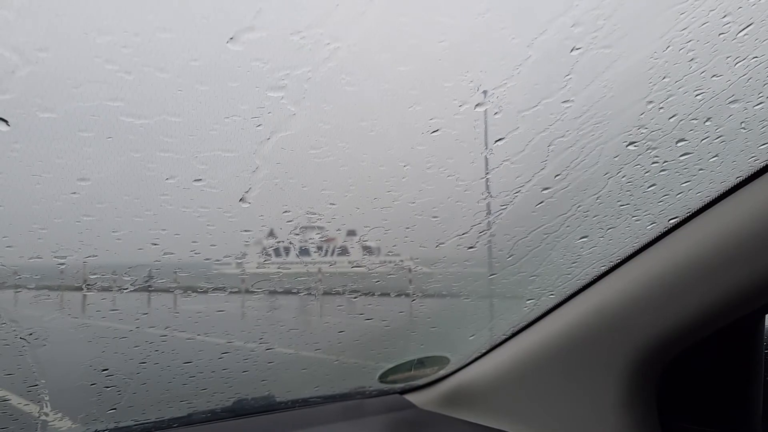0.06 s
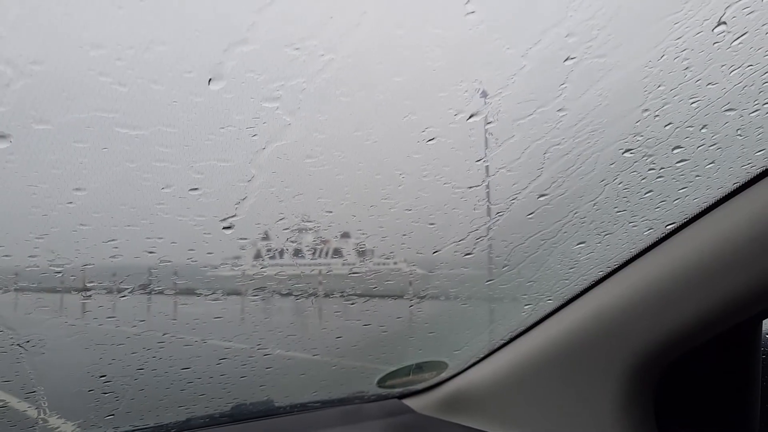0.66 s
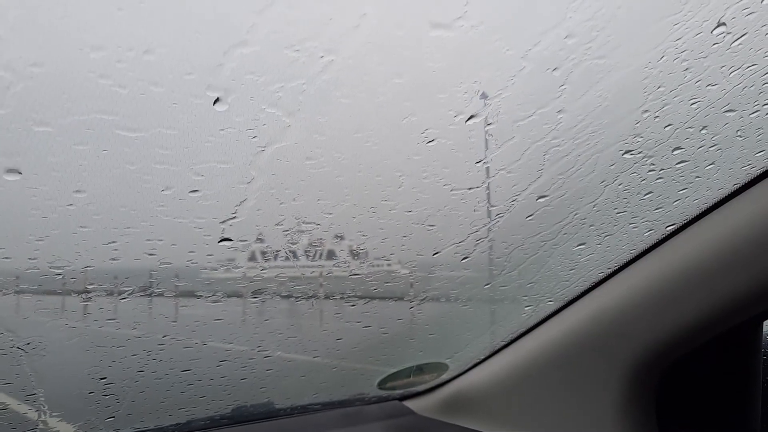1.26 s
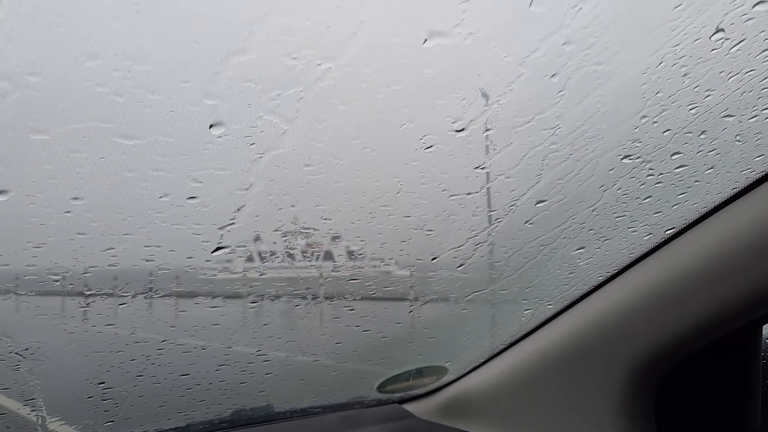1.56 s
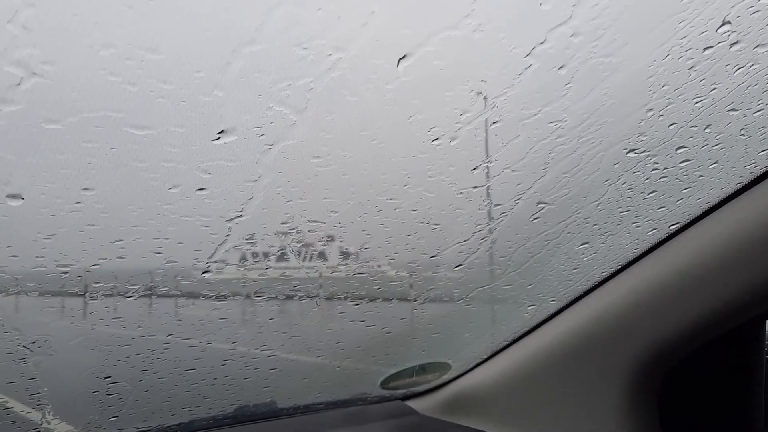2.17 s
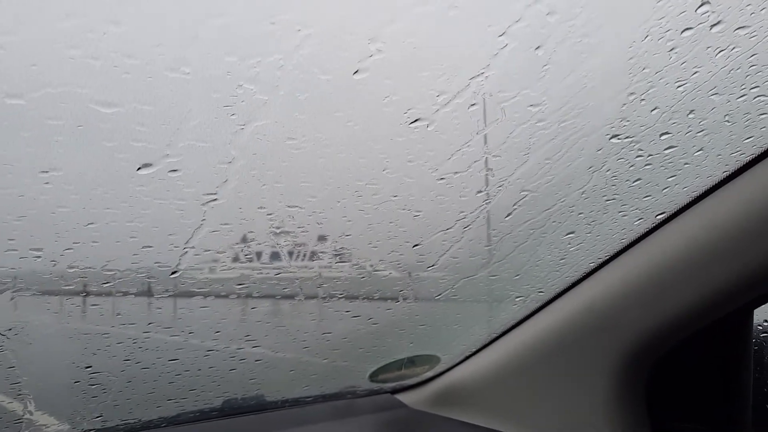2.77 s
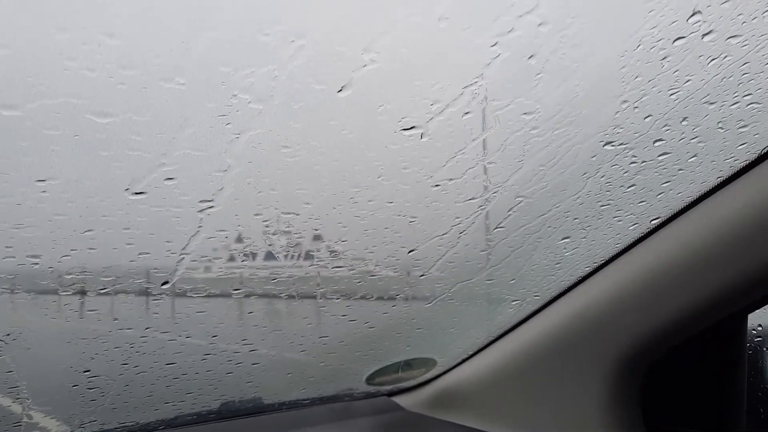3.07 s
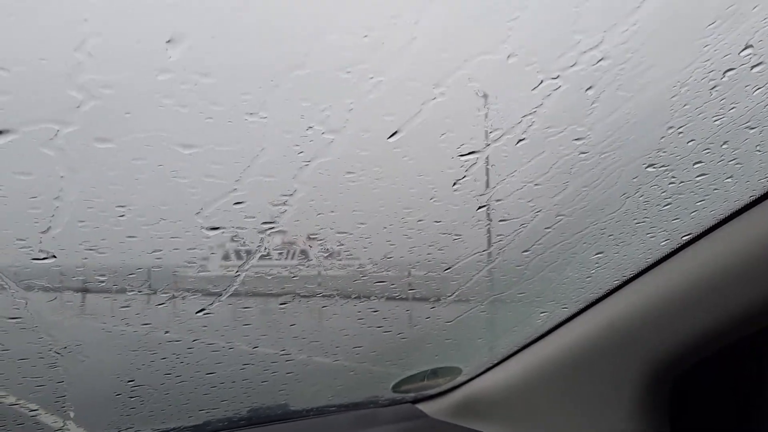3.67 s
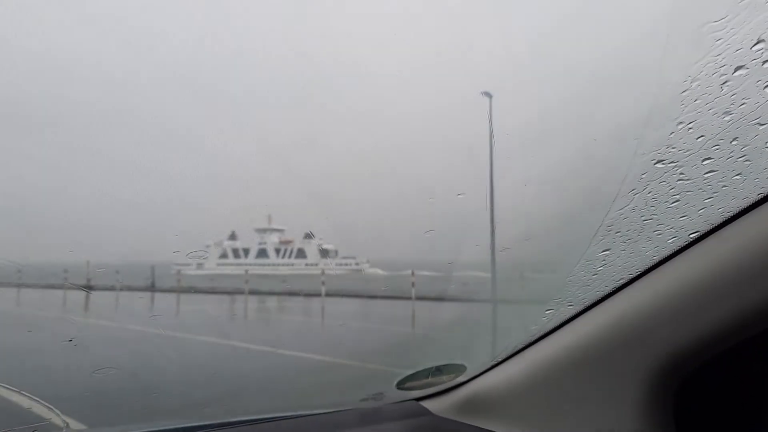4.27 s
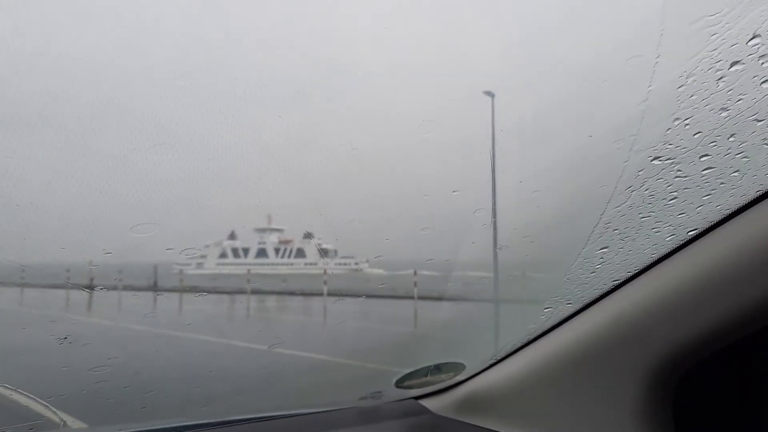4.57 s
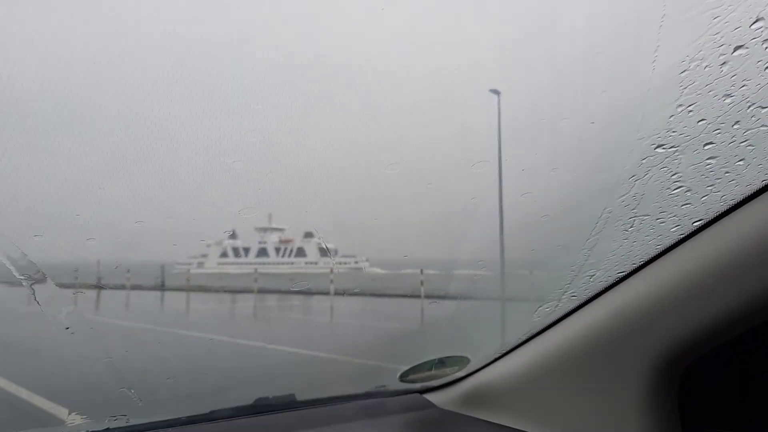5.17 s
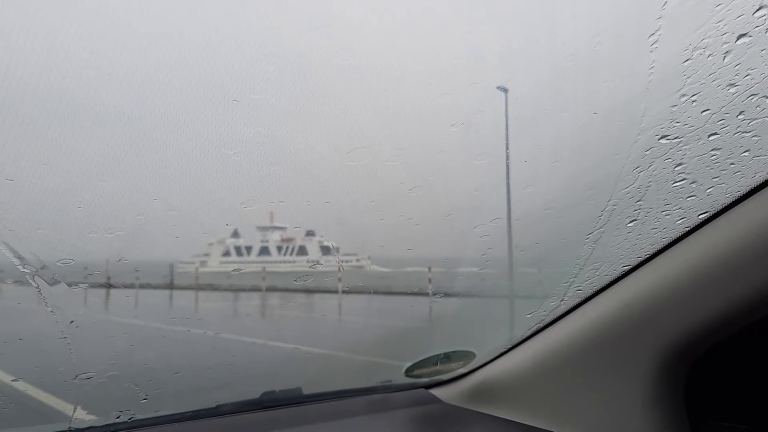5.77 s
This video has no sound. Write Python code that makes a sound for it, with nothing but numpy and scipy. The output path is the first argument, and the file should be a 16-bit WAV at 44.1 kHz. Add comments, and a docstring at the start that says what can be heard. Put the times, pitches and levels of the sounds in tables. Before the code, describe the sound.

Inside an idling car, steady rain ticks on the glass and roof, then the wipers start up with knocks and a low drone.

```python
"""Rain on a parked car

From a front seat: small drops patter on roof and glass, some tick sharply, and fat drips plonk on
the roof panel. Near four seconds the wipers thump into motion, drone through their sweep, knock
as they turn and come back to rest. Underneath, the engine idles and the blower hums."""
import sys
import numpy as np
from scipy import signal
from scipy.fft import rfft, irfft
from scipy.io import wavfile

SR = 44100
rng = np.random.default_rng(int(sys.argv[2]) if len(sys.argv) > 2 else 0)


def transcribe(u):
    """Save the signal u as a 16-bit wav file named by the first command-line argument.

    u: samples, shape (n,) or (channels, n), limited to [-1, 1]; the rate is SR.
    q: integer samples, one column per channel.
    """
    v = np.clip(np.atleast_2d(u).T, -1, 1)
    q = np.round(v * 32767).astype(np.int16)
    wavfile.write(sys.argv[1], SR, q)


N = 256662
TIME = np.arange(N) / SR
WIPERS_ON_S = 3.85
WIPING_S = np.maximum(TIME - WIPERS_ON_S, 0)

# The cabin's low rumble, swelling briefly at the start and again while the wipers run.
# Each row: time in seconds, relative level in dB.
RUMBLE_SWELL = [(0, -39), (.22, -31.5), (.45, -39), (3.3, -37), (4.1, -38), (4.5, -31), (5.1, -36),
                (5.82, -34.5)]


def rain(near_db=10.5, wash_db=8.5, pinpoint_db=-14.5, spray_db=-12, spray_growth=1.8):
    """Separate near drops over a dense wash, with pinpoint ticks and gusts of fine spray on top."""
    # How hard it rains. Each row: time in seconds, relative level in dB.
    intensity = [(0.0, -61), (0.68, -62.5), (1.13, -61), (1.3, -63.5), (1.75, -62), (1.94, -61.5),
                 (2.27, -64), (2.51, -61.5), (2.72, -62), (3.39, -62), (3.84, -62), (4.08, -60),
                 (4.64, -61), (5.06, -61), (5.38, -63), (5.82, -62)]
    # The tone of the patter and of the spray. Each row: frequency in Hz, relative level in dB.
    patter_eq = [(260, -31.5), (450, -1.5), (560, -7.5), (950, -11.5), (1100, -11.5), (1300, -16),
                 (1950, -16.5), (2800, -22.5), (3700, -22.5), (4700, -28), (8200, -33), (9400, -42.5),
                 (12500, -44), (15800, -52)]
    spray_eq = [(3000, -28), (8000, 4), (9600, -4), (11500, 3), (13000, 0), (15800, 2.5)]
    # Gusts throw spray on the glass. Each row: centre in seconds, level in dB, half length in seconds.
    gusts = [(1.83, -70, 0.044), (2.62, -69, .1), (3.55, -69, .13)]
    rain_db = follow(intensity)[0]
    near = shower(per_s=950, spread_db=3.5, decay_s=.0039, octaves=2.1, clump_db=2.5, crack=1)
    near = unit_rms(colour(near, patter_eq))
    wash = noise(lambda f: curve_at(patter_eq, f), N) * amp(.18 * drift(21))
    pinpoints = shower(per_s=110, spread_db=7, decay_s=.0007, octaves=2.2, clump_db=6, crack=2.5)
    pinpoints = unit_rms(colour(pinpoints, spray_eq))
    patter = amp(near_db) * near + amp(wash_db) * wash + amp(pinpoint_db) * pinpoints
    # As the rain thickens, the spray grows faster than the patter.
    spray_gain = amp(rain_db.mean() + spray_db + spray_growth * (rain_db - rain_db.mean()))
    spray_gain += sum(amp(db) * np.exp(-((TIME - s) / half_s) ** 2) for s, db, half_s in gusts)
    hiss = noise(lambda f: curve_at(spray_eq, f), N)
    return amp(rain_db) * patter + spray_gain * hiss


def shower(per_s, spread_db, decay_s, octaves, clump_db, crack, spots=28):
    """Drops of many sizes land at random, louder in clumps, on spots with their own tone and pan."""
    out = np.zeros((2, N))
    clumps_db = clump_db * np.tanh(drift(38))
    for hz in np.geomspace(1100, 14000, spots):
        hits = rng.random(N) < per_s / spots / SR
        size_db = np.minimum(spread_db * rng.exponential(1, N), 12)
        drop = splash(hz, octaves, decay_s * rng.uniform(.43, 2.37), crack, cabin_db=-18) * np.sqrt(hz)
        pan = amp(rng.normal(0, .67) * np.array([[1], [-1]]))
        impacts = hits * amp(size_db + clumps_db)
        out += signal.oaconvolve(impacts[None], drop * pan, axes=1)[:, :N]
    return out


def splash(hz, octaves, decay_s, crack, crack_s=.00014, cabin_db=-17, cabin_s=.016, size=4096):
    """One drop: a crack, the shudder of the pane and a short cabin tail."""
    t = np.arange(size) / SR
    envelope = crack * np.exp(-t / crack_s) + np.exp(-t / decay_s) + amp(cabin_db) * np.exp(-t / cabin_s)
    return noise(lambda f: hump(f, hz, octaves), size) * envelope / (1 + crack)


def glass_ticks():
    """Hard drops and wiper snaps, heard through the glass close by."""
    # The sharpest drops. Each row: start in seconds, level in dB before the glass EQ,
    # centre in Hz, decay in seconds.
    hard_drops = [(0.752, -39.5, 3500, .0078), (0.99, -38, 6950, .003), (1.277, -38, 5970, .003),
                  (1.536, -37.5, 1950, .0064), (1.660, -42, 8000, .002), (1.734, -39.5, 3500, .008),
                  (1.851, -41, 5030, .0057), (2.644, -40, 4000, 0.0076), (2.897, -39.5, 3466, .009),
                  (3.012, -33, 9430, .002), (3.119, -38, 13000, .008), (3.131, -33, 4970, 0.0028),
                  (3.205, -37.5, 3000, 0.0037), (3.539, -36, 7000, 0.0062), (3.715, -39, 6850, 0.0051),
                  (4.104, -40, 3200, .004), (4.465, -35.5, 7500, 0.0024), (4.773, -35.5, 3910, .002),
                  (5.344, -35.5, 4935, .0019), (5.683, -36.5, 5900, .007)]
    # Wet blades and linkage snap and scrape. Each row: start in seconds, level in dB before
    # the glass EQ, centre in Hz, width in octaves, decay in seconds.
    blade_snaps = [(3.829, -35, 4500, 2, 0.019), (3.909, -38, 1200, 0.79, 0.04),
                   (3.946, -29, 3560, 0.44, 0.0027), (5.238, -35, 4920, 1.8, 0.011)]
    # The tone of the glass. Each row: frequency in Hz, gain in dB.
    glass_eq = [(500, 14.5), (2000, 1.5), (3700, 3.5), (5000, -2.5), (8300, -2.5), (9600, -12),
                (12000, -11.5), (15800, -13)]
    out = np.zeros((2, N))
    for s, db, hz, decay_s in hard_drops:
        add(out, s, amp(db) * splash(hz, 1, decay_s, crack=1.75))
    for s, db, hz, octaves, decay_s in blade_snaps:
        add(out, s, amp(db) * splash(hz, octaves, decay_s, crack=.99))
    return colour(out, glass_eq)


def roof_drips(fall_back_s=.0081, fall_back_db=-5.5, panel_swell_s=.0041):
    """Fat drips splatter, partly fall back, and set a roof panel on the left ringing for a few cycles."""
    # Each row: start in seconds, splatter level in dB, its centre in Hz, its decay in seconds,
    # ring level in dB before panning, ring pitch in Hz.
    drips = [(.037, -29.5, 1020, .012, -31, 530), (.299, -43, 1000, 0.011, -51, 550),
             (.367, -45, 800, .005, -53, 553), (1.256, -39, 990, 0.02, -37.5, 600),
             (1.661, -36.5, 751, 0.018, -38, 553), (1.7197, -37.5, 790, 0.014, -23, 509),
             (3.086, -38, 750, 0.026, -41, 550), (4.104, -38, 1000, 0.0031, -49, 551),
             (4.1462, -42, 735, 0.0062, -31.5, 544), (5.590, -39, 690, 0.022, -36, 560)]
    out = np.zeros((2, N))
    t = np.arange(4096) / SR
    swell = (t / panel_swell_s) ** 2 * np.exp(2 * (1 - t / panel_swell_s))
    pan_db = np.array([[3.5], [-3.5]])
    for s, db, hz, decay_s, ring_db, ring_hz in drips:
        add(out, s, amp(db) * splatter(hz, decay_s))
        add(out, s + fall_back_s, amp(db + fall_back_db) * splatter(hz, decay_s))
        add(out, s, amp(ring_db + pan_db) * swell * np.sin(2 * np.pi * ring_hz * t))
    return out


def splatter(hz, decay_s, octaves=.93, attack_s=.001, size=8192):
    """The burst of one fat drip, dull through the roof lining."""
    t = np.arange(size) / SR
    attack = 1 - np.exp(-t / attack_s)
    return noise(lambda f: hump(f, hz, octaves), size) * attack * np.exp(-t / decay_s)


def wipers(running_hz=53.03, start_sag_hz=6.5, spin_up_s=.294, octave_db=-8, recoil_s=.04):
    """The motor spins up and drones; the arms knock on the windscreen and recoil with a lower thud."""
    # Load on the motor, greatest where the arms turn. Each row: time in seconds, level in dB.
    motor_load = [(3.85, -34), (4.3, -35), (4.58, -35), (4.77, -26.5), (4.93, -39.5), (5.82, -37)]
    # Each row: start in seconds, strength in dB, centre of the blow in Hz, recoil in dB against the blow.
    blows = [(3.845, -23, 260, 4), (3.893, -28.5, 600, -13), (3.909, -17.5, 456, -2),
             (3.925, -13.5, 282, -2.5), (3.945, -18, 890, -8), (4.020, -26, 280, -12),
             (4.047, -27, 297, -1), (4.563, -26.5, 375, -5), (4.628, -22, 220, -1), (4.631, -17, 80, -9),
             (4.859, -26.5, 120, -14), (5.238, -22.5, 102, -10), (5.268, -28, 300, -12)]
    hz = running_hz - start_sag_hz * np.exp(-WIPING_S / spin_up_s)
    phase = 2 * np.pi * np.cumsum(hz + .5 * drift(3.7)) / SR
    level = np.minimum(WIPING_S / .05, 1) * amp(follow(motor_load)[0])
    out = np.ones((2, 1)) * level * (np.sin(phase) + amp(octave_db) * np.sin(2 * phase))
    for s, db, blow_hz, recoil_db in blows:
        add(out, s, amp(db) * knock(blow_hz))
        add(out, s + recoil_s, amp(db + recoil_db) * knock(.42 * blow_hz))
    return out


def knock(blow_hz, rise_cycles=.77, reach_octaves=.82, ring_db=3, rattle_db=-10, size=22050):
    """A blow rings the windscreen and rattles the linkage; low blows build and die away more slowly."""
    # Modes of windscreen and scuttle. Each row: pitch in Hz, relative level in dB, seconds to fall 60 dB.
    modes = [(46.2, 1, 0.24), (71.7, -4, 0.19), (105.7, -0.5, 0.15), (134.5, 1.5, 0.11), (176.3, -9, 0.21),
             (237, -20, 0.079), (309.3, -1, 0.14), (351.7, -3, 0.079), (403, -39, 0.054),
             (683, -6.5, 0.074), (822, -8, 0.045), (920, -21.5, .035), (1250, -25, 0.027)]
    t = np.arange(size) / SR
    ring = sum(amp(db + hump(hz, blow_hz, reach_octaves) - 60 * t / t60) * np.sin(2 * np.pi * hz * t)
               for hz, db, t60 in modes)
    rattle_s = .046 * 200 / blow_hz
    rattle = noise(lambda f: hump(f, blow_hz, octaves=.39), size) * np.exp(-t / rattle_s)
    attack = 1 - np.exp(-t * blow_hz / rise_cycles)
    return (amp(ring_db) * ring + amp(rattle_db) * rattle) * attack


def cabin_rumble(crossover_hz=410, bass_trim_db=-4, air_db=-41):
    """The cabin's low rumble swells below the crossover; a steady rush of air takes over above it."""
    # The tone of engine and air. Each row: frequency in Hz, relative level in dB.
    cabin_eq = [(20, -34), (36, -7), (48, -4), (64, -3), (75, 1.5), (98, 4.5), (132, -3.5), (160, -6),
                (225, -15), (300, -4), (365, -8.5), (460, -15), (800, -22.5), (1500, -73)]
    cabin = noise(lambda f: curve_at(cabin_eq, f), N)
    bass = irfft(rfft(cabin) / (1 + (np.fft.rfftfreq(N, 1 / SR) / crossover_hz) ** 4), N)
    return amp(follow(RUMBLE_SWELL)[0] + bass_trim_db) * bass + amp(air_db) * (cabin - bass)


def engine_and_blower_hum(trim_db=-2, swell_share=.89, engine_below_hz=200, blower_sag=.006):
    """The low tones swell with the rumble; blower tones go slightly flat as the wipers draw current."""
    # Each row: pitch in Hz, relative level in dB, flutter depth from 0 to 1.
    tones = [(51.3, -44.5, 0.57), (57.6, -51.5, 1), (74.6, -48.5, 0.92), (94.8, -42.5, 0.27),
             (101.7, -46.5, 0.7), (116.8, -49.5, 0.25), (128.5, -47.5, 0.6), (133, -50.5, 0.15),
             (287.7, -53, 0.02), (306, -42, 0.18), (333.3, -57, 0.68), (586, -63, 1), (1092, -66, 0.44)]
    rumble_db = follow(RUMBLE_SWELL)[0]
    swell = amp(swell_share * (rumble_db - rumble_db.mean()))
    out = np.zeros(N)
    for hz, db, depth in tones:
        is_engine = hz < engine_below_hz
        cycles = hz * (TIME if is_engine else TIME - blower_sag * WIPING_S)
        flutter = 1 + depth * (drift(6.1) + 1j * drift(2))  # wavers in both level and phase
        tone = np.real(flutter * np.exp(2j * np.pi * (cycles + rng.random())))
        out += amp(db + trim_db) * tone * (swell if is_engine else 1)
    return out


def motor_whine(level_db=-48, sink_db=-4, jitter_hz=1.41):
    """A small motor whines at a wandering speed and sinks in level once the wipers draw current."""
    # Each row: time in seconds, pitch in Hz.
    pitch_path = [(0, 433.4), (.3, 429), (.6, 431.5), (1.3, 435.3), (2.05, 427.5), (2.7, 436), (3.15, 417),
                  (3.85, 418.5), (4.4, 433), (5, 443), (5.82, 431)]
    hz = follow(pitch_path)[0] + jitter_hz * drift(14.2)
    level = amp(level_db + sink_db * np.minimum(WIPING_S, 1))
    waver = 1 + .12 * drift(3)
    return level * waver * np.sin(2 * np.pi * np.cumsum(hz) / SR)


def noise(shape_db, size):
    """Stereo noise of a given spectrum: nearly centred in the bass, diffuse in the treble."""
    # Each row: frequency in Hz, likeness of left and right from 0 to 1.
    stereo_likeness = [(60, 0.75), (130, 0.87), (300, 0.94), (640, 0.13), (1300, 0)]
    hz = np.fft.rfftfreq(size, 1 / SR)
    left, other = np.exp(2j * np.pi * rng.random((2, len(hz))))
    likeness = curve_at(stereo_likeness, hz)
    right = likeness * left + np.sqrt(1 - likeness ** 2) * other
    return unit_rms(irfft(np.array([left, right]) * amp(shape_db(hz)), size))


def drift(rate_hz):
    """A smooth random wobble of unit RMS."""
    hz = np.fft.rfftfreq(N, 1 / SR)
    return unit_rms(irfft(rfft(rng.standard_normal(N)) * np.exp(-(hz / rate_hz) ** 2), N))


def colour(x, eq, size=2048):
    """A minimum-phase EQ that keeps attacks sharp."""
    log_gain = np.log(amp(curve_at(eq, abs(np.fft.fftfreq(size, 1 / SR)))))
    taps = np.fft.ifft(np.exp(np.conj(signal.hilbert(log_gain)))).real
    return signal.oaconvolve(x, taps[None], axes=1)[:, :N]


def hump(hz, centre_hz, octaves):
    """A rounded peak in dB whose skirts steepen away from the centre."""
    away = (np.log2((hz + 1) / centre_hz) / octaves) ** 2
    return -20 * np.log10(1 + away / 2 + away ** 2 / 2)


def curve_at(points, hz):
    """A curve's value at hz, its points joined on a log-frequency axis."""
    f, value = np.transpose(points)
    return np.interp(np.log(hz + 1), np.log(f + 1), value)


def follow(rows):
    """Each column of an automation curve at every sample."""
    s, *columns = np.transpose(rows)
    return [np.interp(TIME, s, c) for c in columns]


def add(mix, start_s, sound):
    part = mix[:, max(round(start_s * SR), 0):][:, :sound.shape[-1]]
    part += sound[..., :part.shape[-1]]


def amp(db):
    return 10 ** (np.asarray(db) / 20)


def unit_rms(x):
    return x / np.sqrt(np.mean(x ** 2) + 1e-20)


def scene():
    """Rain and wipers over the idling car; the cabin favours the left ear in some bands."""
    # Each row: frequency in Hz, left minus right in dB.
    cabin_balance = [(60, 0), (130, 1.5), (300, 5), (520, 0.5), (800, 5.5), (1400, -1.5), (2000, -1),
                     (3000, 4), (6000, -0.3), (9300, 2), (12000, 8), (15500, 1)]
    mix = rain() + glass_ticks() + roof_drips() + wipers()
    mix += cabin_rumble() + engine_and_blower_hum() + motor_whine()
    lean_db = curve_at(cabin_balance, np.fft.rfftfreq(N, 1 / SR))
    return irfft(rfft(mix) * amp(np.array([lean_db, -lean_db]) / 2), N)


def record(dry, low_cut_hz=36, high_cut_hz=15800):
    """Roll off the sub-bass and cut the top treble steeply."""
    low_cut = signal.butter(4, low_cut_hz, btype="high", fs=SR, output="sos")
    high_cut = signal.firwin(511, high_cut_hz, window=("kaiser", 9), fs=SR)
    return signal.oaconvolve(signal.sosfilt(low_cut, dry), high_cut[None], "same")


dry = scene()
out = record(dry)
transcribe(out)
```